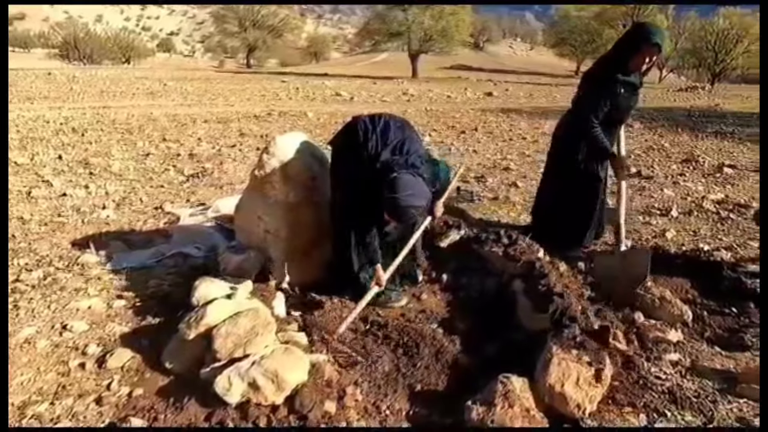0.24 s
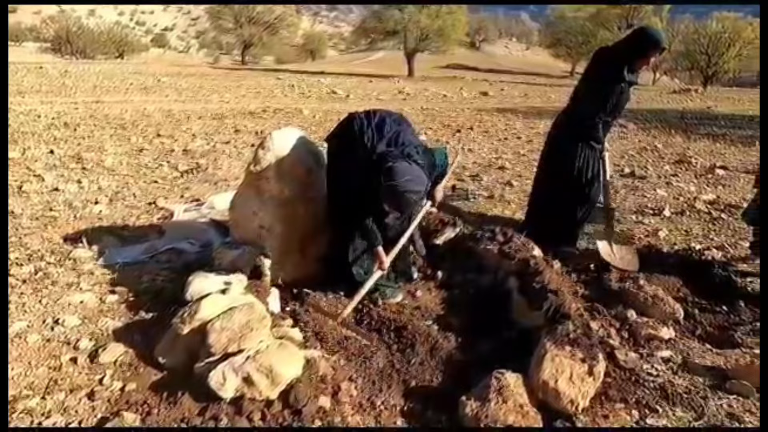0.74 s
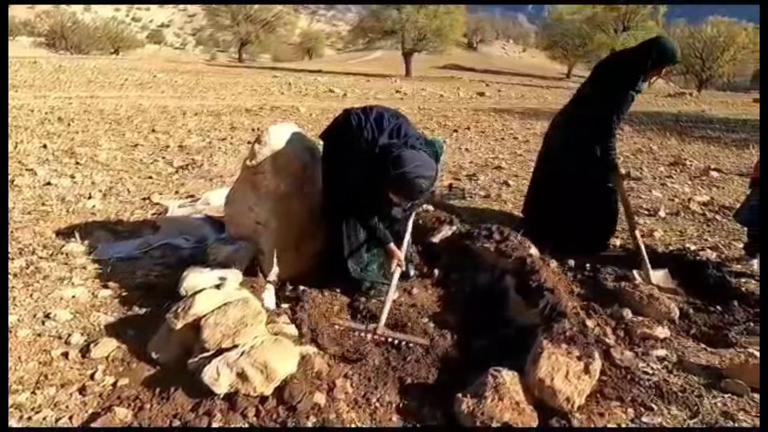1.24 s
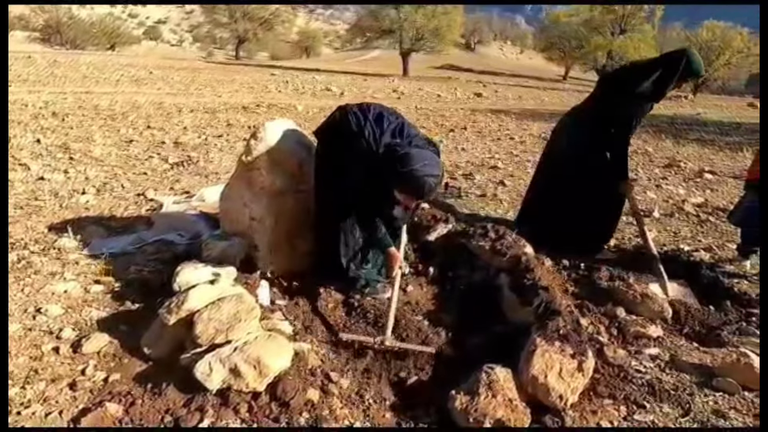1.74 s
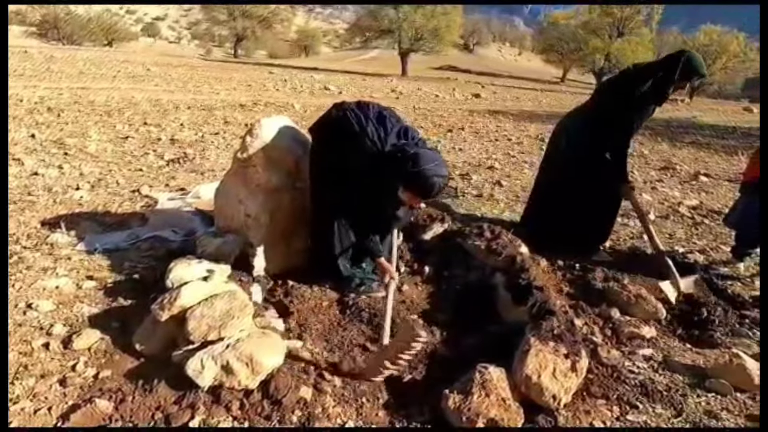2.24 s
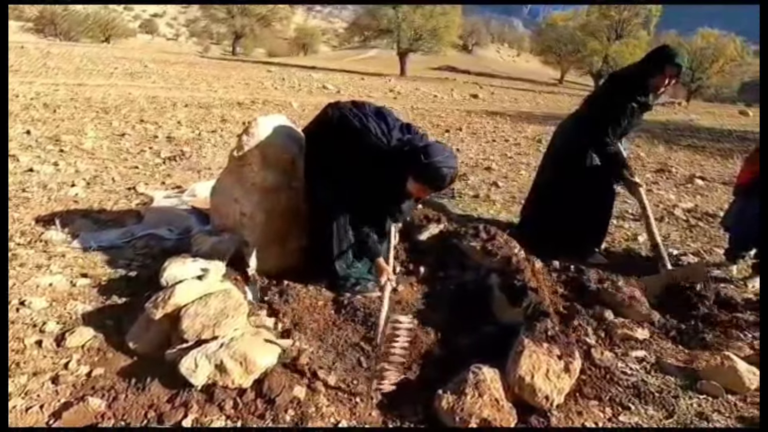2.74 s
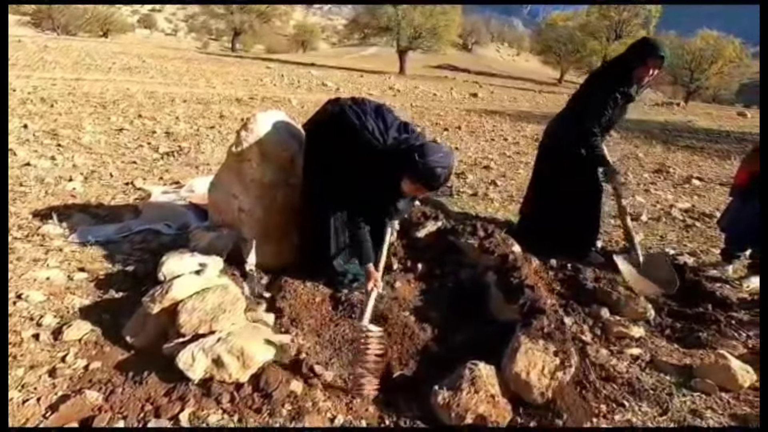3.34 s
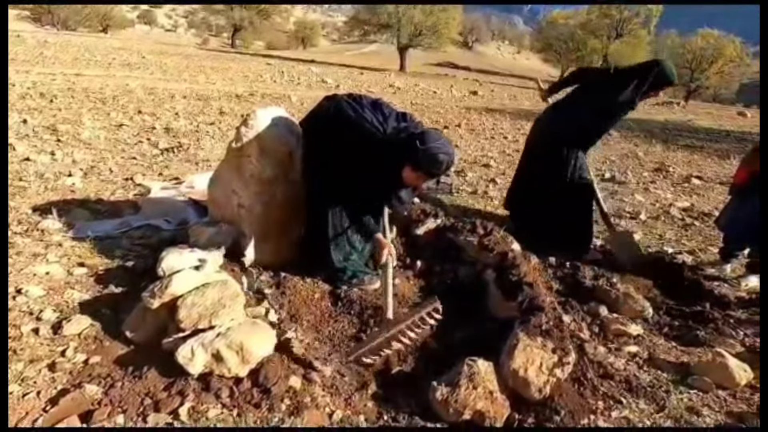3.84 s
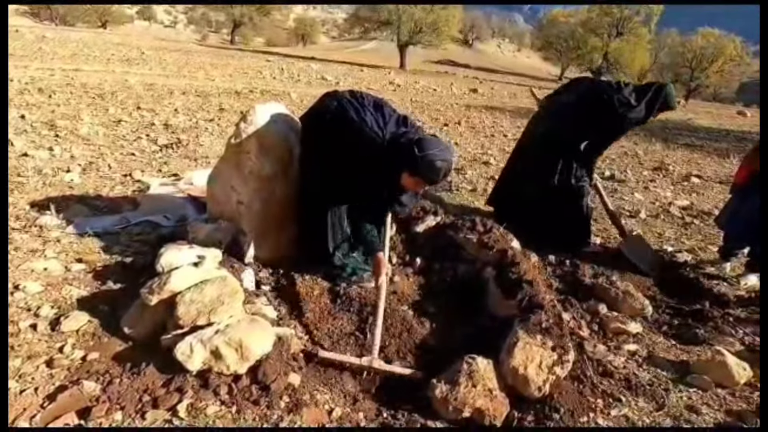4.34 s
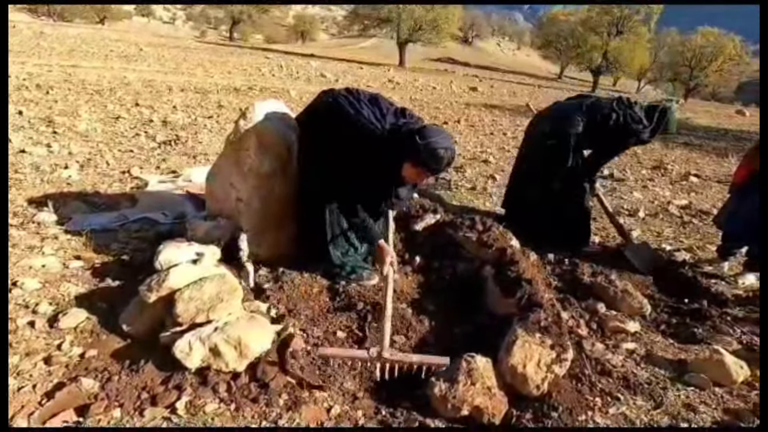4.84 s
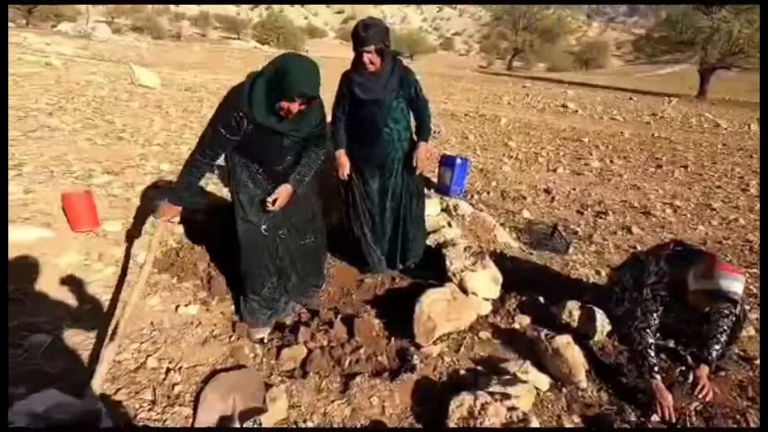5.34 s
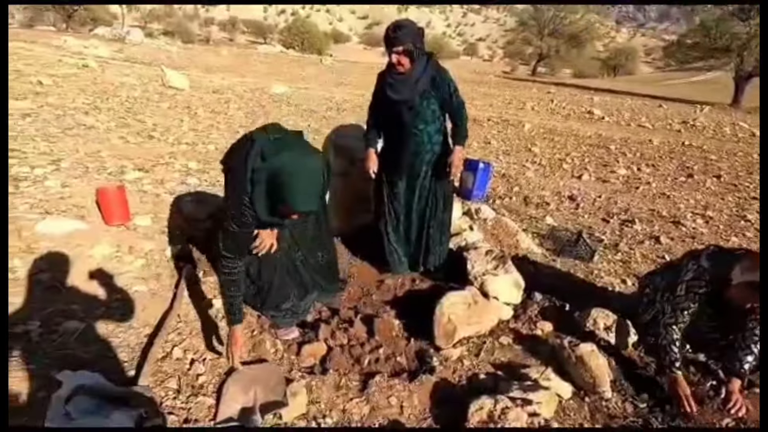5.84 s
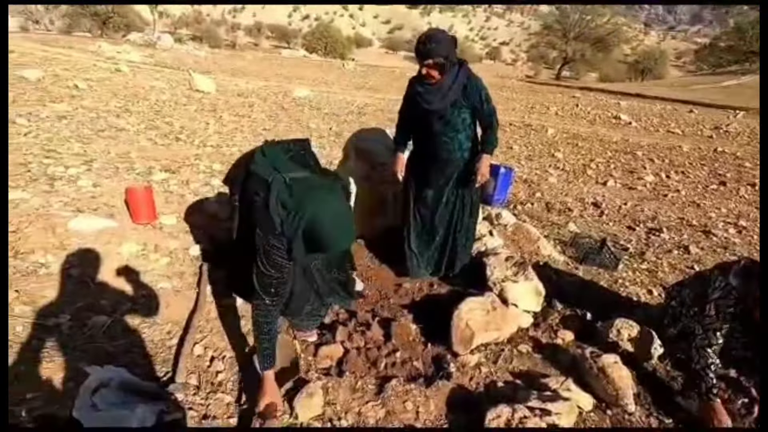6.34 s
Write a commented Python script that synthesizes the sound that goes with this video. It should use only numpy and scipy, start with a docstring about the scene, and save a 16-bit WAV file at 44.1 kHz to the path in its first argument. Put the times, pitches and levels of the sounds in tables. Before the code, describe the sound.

Close outdoor digging in dry, stony ground, with low wind rumbling and fluttering on the microphone, especially in the first 1.5 seconds. A light scrape opens, then a run of crunchy chops at 0.35-0.65 s and a heavier cluster at 1.0-1.25 s. Around 1.6-1.8 s stones clack and a bright, sharp hit glances off rock with a faint tine ring. A soft thud follows at 2.05 s, then a crisp gravelly bite with a loud pebble tick at 2.35-2.45 s. Chops at 2.95 and 3.5 s bring stone clacks, blade clinks and trailing grit. More strokes fall at 4.0, 4.3 and 4.65 s. Wind puffs near 5.05 s and a distant bird chirps around 5.4 s. Hard metallic knocks with deep thuds land at 5.46 and 5.78 s; soil trickles quietly, a faint chirp comes at 6.3 s, and a final scrape and crunch end at 6.55 s.

```python
"""Steel chops into dry, stony soil, crunches, scrapes and clinks; clods thud and pebbles tick.
Wind rumbles and flutters on the microphone, and a small bird chirps far off in the open field.
Crunches and scrapes are showers of random clicks, shaped by filters; wind and air are filtered noise.
Clinks, struck stones and thuds are fading sine waves; the bird is a whistle with a rapidly shaking pitch.
Both channels carry the same scene, each with its own faint hiss."""
import sys
import numpy as np
from scipy import signal
from scipy.io import wavfile
from scipy.ndimage import uniform_filter1d

SR = 44100
rng = np.random.default_rng(int(sys.argv[2]) if len(sys.argv) > 2 else 0)


def to_wav(s):
    """Save 16-bit WAV."""
    ch = np.atleast_2d(s).T  # columns
    pcm = np.round(np.clip(ch, -1, 1) * 32767)  # PCM
    wavfile.write(sys.argv[1], SR, pcm.astype(np.int16))


N = 290486  # length in samples

# In these tables, "fade time" is the time in seconds to fall by 60 dB.
# Wind strength on the microphone. Each row: time in seconds, level in dB.
WIND_LEVELS = [(0, -36.5), (.42, -33), (.9, -35), (1.32, -34), (1.53, -42.5), (1.66, -38.5), (2.5, -40.5),
               (3.45, -45), (3.83, -50.5), (4.1, -46), (4.9, -45.5), (5.06, -33), (5.35, -39.5),
               (5.86, -35.5), (6.06, -47), (6.59, -45.5)]
# Short fluttering gusts. Each row: middle in seconds, level in dB, half length in seconds.
GUSTS = [(0.328, -37, 0.035), (0.437, -32.5, 0.024), (0.669, -45.5, 0.068), (1.317, -37, 0.059)]
# Tone of the slow wind rumble. Each row: frequency in Hz, gain in dB.
RUMBLE_TONE = [(12, -1.5), (28, 1.5), (80, -7.5), (140, -25), (600, -92)]
# Tone of the faster wind flutter. Each row: frequency in Hz, gain in dB.
FLUTTER_TONE = [(50, -22.5), (110, 6.5), (170, 5.5), (400, -18.5), (1500, -65.5)]
# Tone of the still air. Each row: frequency in Hz, gain in dB.
AIR_TONE = [(400, 2.5), (750, -9.5), (1600, -3), (3000, -9.5), (7500, -14), (9000, -28.5), (15000, -35.5)]
# Strokes of steel through loose soil. Each row: start in seconds, length in seconds,
# level halfway in dB, growth over the stroke in dB, brightness in dB (before the tilt factor),
# pushed earth in dB relative to the stroke.
STROKES = [(0, 0.069, -58.5, -13, 0, -11), (0.103, 0.16, -52.5, -7, 17, -33),
           (0.391, 0.2106, -45.5, 8, 14, -15), (0.647, 0.067, -60, 16.5, -7, -5),
           (0.989, 0.39, -51.5, -18, 3, -19), (1.467, 0.14, -62.5, -8, -5, -4.5),
           (1.583, 0.035, -45.5, -7.5, -13, -2), (1.659, 0.14, -46.5, 0, 6, -2.5),
           (2.353, 0.12, -40.5, -8.5, 20, -10), (2.516, 0.061, -57.5, -9, 16, -5.5),
           (2.938, .11, -42.5, 6, -7, -11), (3.027, 0.426, -53.5, -10.5, 15, -9.5),
           (3.51, 0.082, -43.5, 14, -7, -10), (3.589, 0.14, -55.5, -5, 3, -1),
           (3.975, 0.12, -44, 6.5, -17, -18.5), (4.289, 0.17, -47.5, -1, 14, -17),
           (4.449, 0.208, -51.5, 17.5, 7, -21), (4.685, 0.047, -57.5, -0.5, -5, -7),
           (4.913, 0.031, -48, -2, -5, -16), (5.198, 0.44, -59, 9, 14, -3),
           (5.498, 0.25, -53, -2.5, 5, -23.5), (5.778, .12, -50.5, 5.5, -21, -1),
           (5.951, 0.6, -61, 0, 15, -29), (6.419, 0.16, -42.5, 8, 2, -9)]
# Tone of crushed soil. Each row: frequency in Hz, gain in dB.
SOIL_TONE = [(60, 2), (250, 1.5), (420, 0), (620, -7), (850, 1), (1250, 0), (3400, -0.5), (4800, -2),
             (7400, -5), (8800, -15), (12000, -21), (15000, -33)]
# Sliding grit, softer at the top than a blow. Each row: frequency in Hz, gain in dB.
GRIT_TONE = [(300, 0), (1200, 1.5), (3000, 2), (7500, -1.5)]
# Low scrunch of earth pushed ahead of the steel. Each row: frequency in Hz, gain in dB.
EARTH_TONE = [(120, -2.5), (400, -1), (700, -4.5), (1400, -33.5), (5000, -44.5)]
# Single pebble ticks. Each row: time in seconds, peak level in dB, middle frequency in Hz.
PEBBLES = [(0.065, -38, 4470), (0.618, -30, 1800), (.674, -42, 2400), (1.198, -22.5, 3580),
           (1.377, -44.5, 1460), (1.579, -40, 1990), (2.3422, -28, 5500), (2.4232, -15.5, 3270),
           (2.46, -34, 3600), (2.676, -34.5, 2550), (2.9378, -27, 2940), (3.139, -25, 3800),
           (3.201, -33, 3650), (3.278, -32.5, 3820), (4.057, -34, 4450), (4.492, -30.5, 1450),
           (4.907, -33, 4220), (5.21, -43, 1310), (5.837, -33.5, 1680), (5.876, -29, 1340)]
# Blows of steel into soil. Each row: time in seconds, force in dB, brightness in dB per octave,
# ground thud in dB (before THUD_GAIN_DB), fade time of the crushing in seconds.
BLOWS = [(0.364, -31.5, -3, -45.5, 0.064), (0.403, -32.5, 0.5, -44, 0.15), (0.472, -38, 1.5, -61, 0.087),
         (0.5, -35.5, 2.5, -73, 0.061), (0.544, -38.5, 3, -65, 0.062), (0.653, -44.5, -2, -83, 0.014),
         (.988, -29.5, -0.5, -38.5, 0.065), (0.996, -26.5, 1, -54, 0.046), (1.056, -30, 3, -50, 0.055),
         (1.077, -35, 7, -38, 0.065), (1.117, -32.5, 0.5, -33.5, 0.064), (1.198, -36, 2, -51, 0.073),
         (1.261, -40, 3, -47, 0.12), (1.601, -31.5, 0.5, -58, 0.053), (1.662, -38.5, -6.5, -78, 0.3),
         (1.7552, -17, 2.5, -42, 0.041), (1.781, -33.5, 0, -66, 0.084), (1.819, -44, 6.5, -55, 0.14),
         (1.988, -48.5, 7, -59, 0.06), (2.101, -43.5, 0, -47, 0.066), (2.245, -43, 1, -51, 0.01),
         (2.3415, -24.5, 9, -58, 0.084), (2.35, -23, -2, -38, 0.11), (2.424, -35.5, 2, -52.5, 0.081),
         (2.9375, -26, 0, -30, 0.047), (2.955, -28, 1.5, -43.5, 0.052), (2.998, -37.5, 3, -44, 0.066),
         (3.039, -35.5, -1, -50, 0.17), (3.498, -29.5, 2, -37.5, 0.059), (3.57, -27, -1, -55, 0.12),
         (3.606, -34, -2.5, -52, 0.09), (3.669, -45.5, 6, -71, 0.062), (3.683, -39.5, 5, -49, 0.057),
         (3.747, -48.5, -0.5, -59.5, 0.069), (3.965, -30.5, 0, -51.5, 0.066),
         (4.078, -37.5, -2.5, -71, 0.047), (4.111, -34.5, 0.5, -39.5, 0.08),
         (4.2885, -28.5, 8, -45.5, 0.048), (4.312, -21, 5, -46, 0.043), (4.657, -28, 1.5, -32, 0.04),
         (5.4615, -22.5, -2, -50.5, 0.047), (5.774, -25.5, -14.5, -52.5, 0.0071),
         (6.568, -27, -2.5, -43, 0.13)]
# Crunch of a blow of middling brightness. Each row: frequency in Hz, gain in dB.
CRUNCH_TONE = [(1340, 4), (3150, 8), (6300, 2.5), (12000, -5)]
# Ringing of the rake head, damped by soil. Each row: frequency in Hz, width in Hz, level in dB.
RAKE_MODES = [(1336, 110, 10), (1737, 260, 10), (2502, 110, 6.5), (2830, 79, 4), (3460, 13, -0.5),
              (3770, 20, -3), (5880, 25, 0.5), (5880, 200, 6.5), (6540, 230, 1.5)]
# Clods and feet landing. Each row: time in seconds, level in dB, pitch in Hz, fade time in seconds.
THUDS = [(1.117, -25.5, 246, 0.091), (1.746, -24, 514, 0.012), (2.044, -23.5, 146.3, 0.044),
         (2.937, -15, 300, 0.014), (3.266, -33.5, 376, 0.025), (3.427, -28, 352, 0.017),
         (4.657, -12.5, 321, 0.028), (5.468, -5, 148, 0.021), (5.777, -4, 165, 0.016)]
# Fist-sized stones clacking. Each row: time in seconds, peak level in dB, middle pitch in Hz,
# fade time in seconds.
STONES = [(1.609, -23, 2775, 0.041), (1.677, -36, 1244, 0.046), (1.719, -26, 2620, 0.043),
          (1.822, -30.5, 2840, 0.034), (1.868, -34, 2370, .05), (2.247, -35.5, 2714, 0.034),
          (3.0395, -15, 3176, 0.023), (5.7755, -12, 3110, 0.017), (5.7748, -14.5, 1320, 0.015)]
# Tines springing off a stone. Each row: time in seconds, level in dB, most excited pitch in Hz.
TINE_CLINKS = [(1.757, -36.5, 6480), (1.989, -40, 3000)]
# Tines ringing free. Each row: pitch in Hz, level within the clink in dB, fade time in seconds.
TINE_MODES = [(1910, -16, 0.2), (2685, -7, 0.42), (3100, -18, .22), (3400, -13, 0.28), (3540, -11, 0.19),
              (4670, -1.5, .13), (5930, 4.5, .13), (6293, -6.5, .15)]
# Blade knocking on stones. Each row: time in seconds, level in dB, most excited pitch in Hz.
SPADE_CLINKS = [(3.039, -25.5, 3540), (3.57, -38, 3700), (3.747, -38.5, 3510), (5.462, -18, 4060),
                (5.468, -34.5, 990), (5.775, -26.5, 1370), (5.836, -31.5, 685), (5.875, -32, 950)]
# Spade blade ringing. Each row: pitch in Hz, level within the clink in dB, fade time in seconds.
SPADE_MODES = [(552, -7, 0.13), (880, 1, 0.086), (991, -1.5, 0.1), (1190, 3.5, 0.11), (1580, 0, 0.14),
               (2008, -4, 0.06), (2450, -1, .06), (2755, -0.5, .06), (2983, 9.5, 0.025),
               (3707, -1.5, 0.095), (4097, -4.5, 0.068), (7700, -17.5, 0.24)]
# Bird chirps, one list each. Each row: time in seconds, pitch in Hz, level in dB.
CHIRPS = [
    [(5.0, 4220, -71), (5.03, 5850, -60), (5.09, 5720, -73.5)],
    [(5.32, 4400, -59), (5.345, 4600, -53), (5.38, 4020, -50.5), (5.41, 4680, -60), (5.45, 4100, -38)],
    [(6.255, 3510, -55.5), (6.275, 4000, -53.5), (6.35, 4310, -56.5), (6.395, 3360, -57)],
]

AIR_DB, EDGE_HZ = -67.5, 15000  # base level of the air; top of the recorded band
CRUNCH_PIVOT_HZ, THUD_HZ, THUD_GAIN_DB = 3020, 336, 18
STROKE_ATTACK_S, STROKE_RELEASE_T60 = 0.016, 0.1
SETTLE_DB, SETTLE_T60 = -14, 0.4  # loosened soil trickles on after each stroke


def gain_of(db):
    """Turns decibels into an amplitude factor."""
    return 10 ** (np.asarray(db) / 20)


def evened(x):
    """Scales a sound to an average strength (rms) of 1."""
    return x / np.sqrt(np.mean(x ** 2) + 1e-20)


def read(points, hz):
    """Reads a tone table between its points, on a logarithmic frequency scale."""
    f, value = np.transpose(points)
    return np.interp(np.log(hz + 1), np.log(f + 1), value)


def follow(rows):
    """Gives the columns of a timed table at every sample."""
    s, *columns = np.transpose(rows)
    return [np.interp(np.arange(N) / SR, s, c) for c in columns]


def add(mix, s, sound):
    """Mixes a sound in, starting at s seconds."""
    part = mix[max(round(s * SR), 0):][:len(sound)]
    part += sound[:len(part)]


def colour(x, *spectra, size=4096):
    """Filters a sound by all the tone tables together, with no ringing ahead of the sound."""
    hz = abs(np.fft.fftfreq(size, 1 / SR))
    log_gain = np.log(gain_of(sum(read(points, hz) for points in spectra)))
    # the Hilbert transform finds the phase that keeps the filter from acting early
    taps = np.fft.ifft(np.exp(np.conj(signal.hilbert(log_gain)))).real
    return signal.oaconvolve(x, taps[:size // 2])[:len(x)]


def grains(n, per_s, spread_db, cap=8.2):
    """Grit makes random clicks, most of them small and a few large."""
    sizes = gain_of(spread_db * np.minimum(rng.exponential(1, n), cap))
    happens = rng.random(n) < per_s / SR
    return evened(sizes * rng.standard_normal(n) * happens)


def stick_slip(n, depth_db, slip_s):
    """Grit catches and gives way, which makes its loudness uneven."""
    wander = uniform_filter1d(rng.standard_normal(n), int(slip_s * SR))
    return gain_of(depth_db * evened(wander))


def wind(flutter_db=-14.0):
    """Large eddies rumble on the microphone; gusts add a faster flutter."""
    strength, t = gain_of(follow(WIND_LEVELS)[0]), np.arange(N) / SR
    gusts = sum(gain_of(db) * np.exp(-((t - s) / half) ** 2) for s, db, half in GUSTS)
    slow = evened(colour(rng.standard_normal(N), RUMBLE_TONE, size=16384))
    fast = evened(colour(rng.standard_normal(N), FLUTTER_TONE, size=16384))
    return strength * slow + (gain_of(flutter_db) * strength + gusts) * fast


def air(swell_db=-0.5, swell_s=0.5, with_wind=0.3):
    """The faint hiss of the open field swells and sinks with the breeze."""
    swell = evened(uniform_filter1d(rng.standard_normal(N), int(swell_s * SR), mode="wrap"))
    wind_db = follow(WIND_LEVELS)[0]
    level_db = AIR_DB + swell_db * swell + with_wind * (wind_db - wind_db.mean())
    return gain_of(level_db) * evened(colour(rng.standard_normal(N), AIR_TONE))


def stroke_effort():
    """Each stroke bites, grows or eases, lets go and leaves soil settling.

    Gives the grit's amplitude, its brightness in dB, and the pushed earth's amplitude."""
    t = np.arange(N) / SR
    power, bright, earth = np.full(N, 1e-20), np.zeros(N), np.zeros(N)
    for start, length, db, growth_db, bright_db, earth_db in STROKES:
        # the bite rises just ahead of the start and is complete there
        bite = np.clip((t - start) / STROKE_ATTACK_S + 1, 0, 1) ** 2
        pull_db = db + growth_db * (np.clip((t - start) / length, 0, 1) - 0.5)
        after = np.clip(t - start - length, 0, 2)
        letting_go_db = -60 * after / STROKE_RELEASE_T60
        settling_db = SETTLE_DB - 60 * after / SETTLE_T60
        release_db = np.maximum(letting_go_db, settling_db)
        stroke = (bite * gain_of(pull_db + release_db)) ** 2
        power += stroke
        bright += stroke * bright_db
        earth += stroke * gain_of(earth_db) ** 2
    return np.sqrt(power), bright / power, np.sqrt(earth)


def small_stone(n, decay_s=0.0009, low_hz=1000.0, high_hz=8000.0, count=3):
    """A small stone of chance size rings briefly, damped by the soil around it."""
    t = np.arange(n) / SR
    hz = low_hz * (high_hz / low_hz) ** rng.random((count, 1))
    phase = rng.random((count, 1))
    ring = np.exp(-t / decay_s) * np.sin(2 * np.pi * (hz * t + phase)).sum(0)
    return ring / np.linalg.norm(ring)


def crumbs(per_s=330, spread_db=2.0, count=24):
    """Small stones of many sizes tumble, each size with its own dry tick."""
    total = np.zeros(N)
    for _ in range(count):
        hits = grains(N, per_s / count, spread_db)
        total += signal.oaconvolve(hits, small_stone(SR // 80))[:N]
    return evened(total)


def drag(per_s=5000, spread_db=0.5, crumbs_db=-7, jerk_db=1.5, jerk_s=0.0079, split_hz=3600, tilt=0.16):
    """Fine grit slides in jerks while coarser crumbs tumble over the steel and earth piles up ahead."""
    effort, bright_db, pushed = stroke_effort()
    jerks = stick_slip(N, jerk_db, jerk_s)
    contacts = (grains(N, per_s, spread_db) + gain_of(crumbs_db) * crumbs()) * jerks
    grit = evened(colour(contacts, SOIL_TONE, GRIT_TONE))
    # dry dust hisses, packed soil sounds duller
    lowpass = signal.butter(2, split_hz, fs=SR, output="sos")
    dull = signal.sosfiltfilt(lowpass, grit)
    lean = gain_of(tilt * bright_db)
    sliding = (dull / lean + (grit - dull) * lean) / np.sqrt((lean ** 2 + lean ** -2) / 2)
    earth = evened(colour(grains(N, per_s, spread_db) * jerks, EARTH_TONE))
    return effort * sliding + pushed * earth


def shifting_contacts(x, patchy_db, patch_s=0.05, lowest_hz=700, size=512):
    """Other tines and stones touch from moment to moment, so narrow resonances come and go."""
    out, hop = np.zeros(N), int(patch_s * SR)
    hz = np.arange(0, SR / 2, SR / size)
    padded = np.pad(x, (hop, 2 * hop))
    fade = signal.windows.hann(2 * hop, sym=False)  # neighbouring patches overlap by half
    for at in range(0, N + hop, hop):
        peaks_db = patchy_db * rng.standard_normal(len(hz))
        peaks_db -= 10 * np.log10(np.mean(gain_of(peaks_db) ** 2))  # average power gain of 1
        piece = np.pad(padded[at:at + 2 * hop] * fade, (0, hop))  # room to ring on
        rung = colour(piece, np.c_[hz, peaks_db * (hz > lowest_hz)])
        add(out, max(at - hop, 0) / SR, rung[max(hop - at, 0):])
    return out


def pebbles(contact_s=0.00021, rattle=0.12, rattle_s=0.01, spread=1.45):
    """A stone makes a sharp contact, then the crumbs around it rattle briefly."""
    out, t = np.zeros(N), np.arange(SR // 20) / SR
    envelope = np.exp(-t / contact_s) + rattle * np.exp(-t / rattle_s)
    for s, db, hz in PEBBLES:
        band = [hz / spread, min(hz * spread, EDGE_HZ)]
        bandpass = signal.butter(2, band, "band", fs=SR, output="sos")
        tick = signal.sosfilt(bandpass, rng.standard_normal(len(t)) * envelope)
        add(out, s, gain_of(db) * tick / abs(tick).max())
    return out


def through_rake(x, ring_db):
    """Each contact is heard directly and through the damped ringing of the steel."""
    t = np.arange(SR // 8) / SR
    ring = np.zeros(len(t))
    for hz, width_hz, db in RAKE_MODES:
        decay = np.exp(-np.pi * width_hz * t)  # a wider resonance dies away sooner
        ring += gain_of(db) * np.sqrt(width_hz) * decay * np.cos(2 * np.pi * hz * t)
    body = gain_of(ring_db) * ring / np.linalg.norm(ring)
    body[0] += 1  # the direct sound
    return signal.oaconvolve(x, body / np.linalg.norm(body))[:len(x)]


def blows(per_s=6500, spread_db=1.0, ring_db=-12.0, lead_s=0.0074, lead_db=-14, hold_s=0.003):
    """A faint swell leads into each blow; then the edge crushes grit, brighter in dry gravel, over a thud of
    the ground."""
    lead = SR // 50  # samples of the faint swell before the blow
    out, t = np.zeros(N), np.arange(-lead, SR // 6) / SR
    hz, crunch_db = np.transpose(CRUNCH_TONE)
    for s, force_db, bright_db, thud_db, t60 in BLOWS:
        leading = gain_of(lead_db) * np.exp(-abs(t) / lead_s)
        crushing = gain_of(-60 * np.maximum(t - hold_s, 0) / t60)
        force = np.where(t < 0, leading, crushing)
        clumps = stick_slip(len(t), 1.6, 0.003)
        crush = through_rake(grains(len(t), per_s, spread_db) * clumps * force, ring_db)
        crush /= np.std(crush[lead:lead + SR // 110])  # level the first 9 ms of every blow
        tone_db = force_db + crunch_db + bright_db * np.log2(hz / CRUNCH_PIVOT_HZ)
        tone = [(THUD_HZ, thud_db + THUD_GAIN_DB), *zip(hz, tone_db)]
        add(out, s + t[0], colour(crush, tone, SOIL_TONE))
    return out


def thuds(rise_turns=0.43, sag=0.16, sag_s=0.00085):
    """Soil gives way under a weight: a few low cycles that sink in pitch."""
    out, t = np.zeros(N), np.arange(SR // 5) / SR
    for s, db, hz, t60 in THUDS:
        turns = np.cumsum(hz * (1 + sag * np.exp(-t / sag_s))) / SR
        rise = 1 - np.exp(-(turns / rise_turns) ** 2)
        add(out, s, gain_of(db - 60 * t / t60) * rise * np.sin(2 * np.pi * turns))
    return out


def stones(spread=0.24, contact_s=0.00053, count=14):
    """A struck stone rings at a close cluster of pitches that the soil soon damps."""
    out, t = np.zeros(N), np.arange(SR // 12) / SR
    for s, db, hz, t60 in STONES:
        envelope = (1 - np.exp(-(t / contact_s) ** 2)) * gain_of(-60 * t / t60)
        modes_hz = hz * (1 + spread * rng.triangular(-1, 0, 1, (count, 1)))
        phase = rng.random((count, 1))
        ring = np.sin(2 * np.pi * (modes_hz * t + phase)).sum(0) * envelope
        add(out, s, gain_of(db) * ring / abs(ring).max())
    return out


def clinks(hits, modes, octaves, rise_s):
    """Free steel rings, mostly near one pitch; a glancing contact builds up more slowly."""
    out, t = np.zeros(N), np.arange(SR // 2) / SR
    rise = 1 - np.exp(-t / rise_s)
    for s, hit_db, centre_hz in hits:
        for hz, db, t60 in modes:
            reach = (1 + (np.log2(hz / centre_hz) / octaves) ** 2) ** -2
            level = rng.choice([-1, 1]) * reach * gain_of(hit_db + db - 60 * t / t60)
            add(out, s, level * rise * np.sin(2 * np.pi * hz * t))
    return out


def bird(rasp_hz=520, smear_s=0.02):
    """A far whistle whose pitch shakes so fast that it rasps, smeared by the trees."""
    out = np.zeros(N)
    for chirp in CHIRPS:
        s, *columns = np.transpose(chirp)
        t = np.arange(s[0], s[-1], 1 / SR)
        hz, db = (np.interp(t, s, c) for c in columns)
        shake = evened(uniform_filter1d(rng.standard_normal(len(t)), size=60))
        whistle = np.sin(2 * np.pi * np.cumsum(hz + rasp_hz * shake) / SR)
        add(out, s[0], gain_of(db) * evened(whistle) * signal.windows.tukey(len(t), 0.15))
    t = np.arange(SR // 20) / SR
    leaves = rng.standard_normal(len(t)) * np.exp(-t / smear_s)
    return signal.oaconvolve(out, leaves / np.linalg.norm(leaves))[:N]


def field(x, scatter_db=-36.5, t60=0.81):
    """Rough ground and trees scatter back a thin, short tail."""
    t = np.arange(SR // 2) / SR
    tail = rng.standard_normal(len(t)) * gain_of(-60 * t / t60)
    return x + gain_of(scatter_db) * signal.oaconvolve(x, tail / np.linalg.norm(tail))[:N]


def scene():
    """Mixes tools, ground and bird in the open air, with wind on the microphone."""
    soil = shifting_contacts(drag(), patchy_db=4.3) + shifting_contacts(blows(), patchy_db=3.9)
    tines = clinks(TINE_CLINKS, TINE_MODES, octaves=0.89, rise_s=0.004)
    spade = clinks(SPADE_CLINKS, SPADE_MODES, octaves=0.65, rise_s=0.0003)
    sources = soil + pebbles() + thuds() + stones() + tines + spade + bird()
    mono = field(sources) + wind() + air()
    return np.array([mono, mono])


def record(dry, hiss_db=-82.0):
    """Adds a separate faint hiss to each channel, then cuts everything above the band edge."""
    wet = dry + gain_of(hiss_db) * rng.standard_normal(dry.shape)
    lowpass = signal.firwin(511, EDGE_HZ, window=("kaiser", 9), fs=SR)
    return signal.oaconvolve(wet, lowpass[None], "same")


dry = scene()
out = record(dry)
to_wav(out)
```